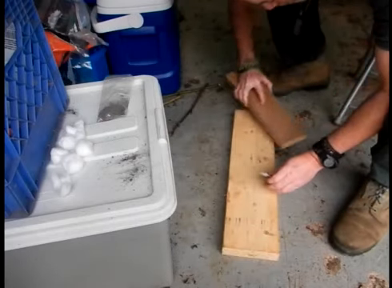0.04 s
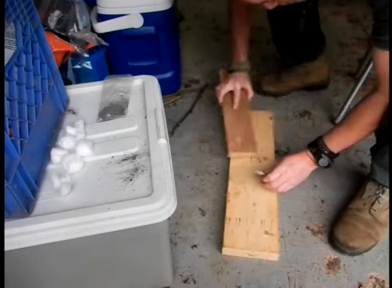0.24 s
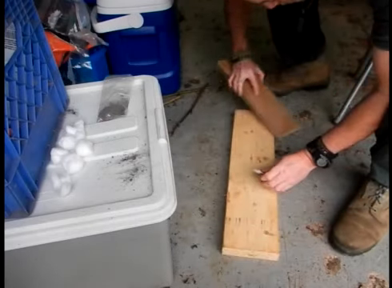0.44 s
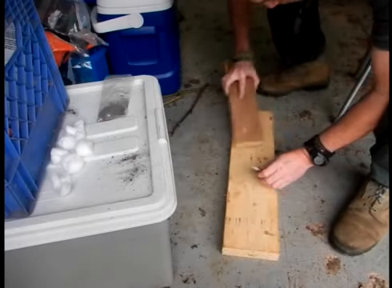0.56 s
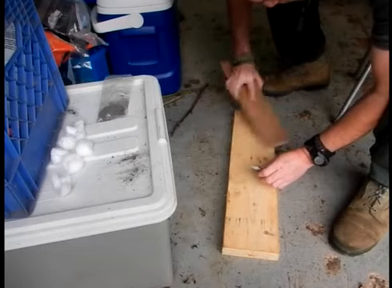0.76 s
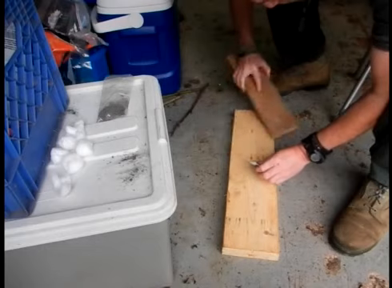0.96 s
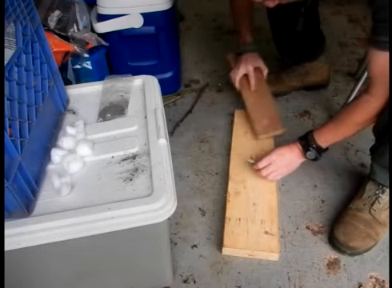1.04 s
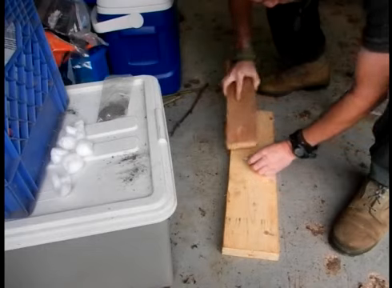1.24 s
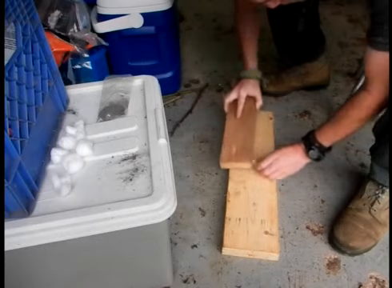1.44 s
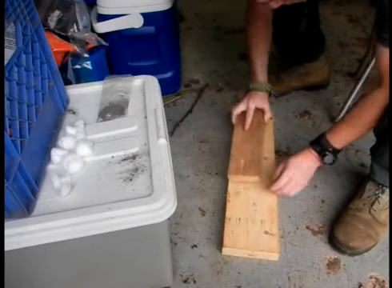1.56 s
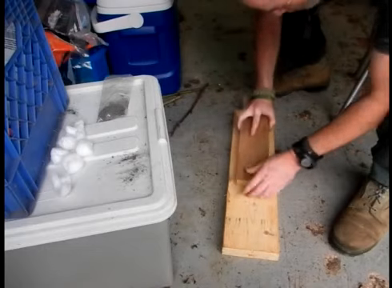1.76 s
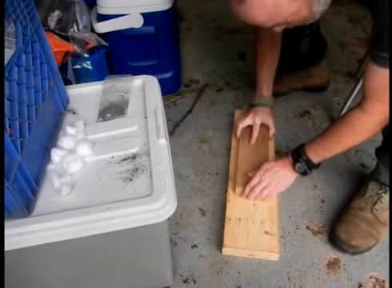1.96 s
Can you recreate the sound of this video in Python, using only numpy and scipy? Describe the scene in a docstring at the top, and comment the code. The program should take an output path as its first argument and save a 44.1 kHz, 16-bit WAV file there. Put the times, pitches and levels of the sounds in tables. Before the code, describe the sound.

A wooden board cracks down on a plank and scrapes forward with a gritty, squeaky rasp, twice within the first second; then faint sliding and two soft taps, close stereo pickup in a small garage with steady room noise.

```python
"""On a garage floor, a short wooden board is twice knocked down on a plank and pushed along it.
Each knock cracks, rings damped modes of the wood and thuds; each push is small slips shaking those modes
under a hiss of crushed grit, with stick-slip chirps. A corner scuffs once on the way back.
Then the board slides quietly into place, as shaped noise, with two soft taps.
Steady room noise and a faint high whine lie beneath."""
import sys
import numpy as np
from scipy import signal
from scipy.fft import rfft, irfft
from scipy.io import wavfile
from scipy.ndimage import uniform_filter1d

SR = 44100
rng = np.random.default_rng(int(sys.argv[2]) if len(sys.argv) > 2 else 0)


def int16_out(signal):
    """Quantize to a 16-bit WAV file."""
    q = np.round(np.clip(np.atleast_2d(signal).T, -1, 1) * 32767)
    wavfile.write(sys.argv[1], SR, q.astype(np.int16))


N = 88200
TIME = np.arange(N) / SR  # s
FREQS = np.arange(N // 2 + 1) * SR / N  # Hz

# Room noise: (frequency [Hz], density [dB per Hz])
AIR_SPECTRUM = [(25, -29), (85, -6), (150, -6.5), (250, -13), (320, -7), (410, 1), (600, -7), (1900, -10.5),
                (2600, -15.5), (5000, -17.5), (7000, -22.5), (13000, -24), (15500, -53)]
AIR_DB = -50.5
# Left-right likeness of sound from all around: (frequency [Hz], correlation [0-1])
LIKENESS = [(60, 0.42), (300, 0.06), (700, 0.2), (1500, 0.59), (3000, 0.47), (6000, 0.1), (15000, 0.27)]
# Electrical whine, rows left and right: (level [dB])
WHINE_LEVELS = [
    [-74],
    [-65],
]
WHINE_HZ, WHINE_WAVER_HZ = 14836, 8

# Quiet sliding and handling: (time [s], level [dB])
SLIDE_LEVEL = [(0, -63.5), (0.78, -58), (0.95, -66.5), (1.35, -58), (1.8, -54.5), (2.0, -50.5)]
# Its rustle: (frequency [Hz], density [dB per Hz])
SLIDE_SPECTRUM = [(200, -22), (450, 5.5), (900, -2.5), (1700, 0), (2500, -2), (5000, -2), (7500, -7),
                  (12500, -6.5), (15500, -26)]

# Modes of the wood, the two main bending modes first:
# (frequency [Hz], level when struck [dB], level when rubbed [dB], decay t60 [s])
WOOD_MODES = [(509, -18.5, -23, 0.13), (715.8, -44.5, -9.5, 0.14), (400.8, -30.5, -44, 0.17),
              (857, -37.5, -24, 0.15), (1111, -36.5, -10.5, 0.19), (1277, -33, -7.5, 0.1),
              (1558, -45, -6, 0.041), (1677, -21, -3, 0.043), (1812, -20, -8.5, 0.12),
              (1964, -19, -2.5, 0.045), (2570, -38, -16, 0.049), (2830, -28, -6, 0.038),
              (4030, -40.5, -16, 0.059), (4913, -40, -16.5, 0.049)]
RADIATION_HZ = 250  # narrow boards radiate little below this

# One list per push of the board: (time [s], level of the wood's rasp [dB], level of the gritty hiss [dB])
STROKES = [
    [(0.206, -33, -52), (0.240, -42, -50), (0.247, -34, -49), (0.259, -32.5, -45), (0.267, -37, -47),
     (0.277, -37, -45), (0.29, -34.5, -50), (0.297, -40, -52), (0.32, -31, -45), (0.333, -39.5, -54),
     (0.342, -39.5, -53), (0.37, -65, -60)],
    [(0.421, -46, -52), (0.427, -36.5, -40.5), (0.435, -41.5, -52), (0.455, -73, -58)],
    [(0.64, -52, -49.5), (0.68, -41, -56.5), (0.702, -40, -52), (0.712, -34, -46), (0.722, -33, -50),
     (0.732, -37.5, -59), (0.75, -67, -67)],
]
# Shaking of the second bending mode as the board passes along: (time [s], extra level [dB])
SECOND_MODE_LEVEL = [(0.24, -8), (0.31, 0.5), (0.42, -5), (0.70, 3), (0.718, 21), (0.75, 13)]
# Broad friction noise: (frequency [Hz], density [dB per Hz])
RUB_SPECTRUM = [(30, -7.5), (120, 1), (230, -8.5), (350, -16), (480, -3.5), (900, -10), (1700, 2.5),
                (2400, -10), (4500, -16.5), (8000, -25)]
# Dust crushed between the faces: (frequency [Hz], density [dB per Hz])
GRIT_SPECTRUM = [(1000, -34), (2400, 9), (3200, 7.5), (5000, 3.5), (7000, -3), (10000, 0), (13000, -6.5),
                 (15500, -14)]
SLIPS_PER_S, SLIP_SPREAD_DB = 650, 2  # small slips of the grain
GRIT_PER_S, GRIT_SPREAD_DB, GRIT_JUDDER_DB = 9000, 0.5, -1
RASP_DB, RUB_DB, GRIT_DB = -0.5, -3, 4.5
MODE_WANDER, MODE_SWELL_DB = .014, 3.5  # moving contact: detuning [share of pitch], uneven feeding

# The grain catches and chirps: (time [s], level [dB], pitch [Hz], build-up [s])
CATCHES = [(0.2415, -26.5, 1630, .0035), (0.255, -24, 1630, 0.0072), (0.2712, -20.5, 1640, 0.00096),
           (0.2771, -30, 1750, 0.0052), (0.2817, -25, 1867, 0.0063), (0.2837, -39.5, 4850, .003),
           (0.2998, -32, 2990, 0.0025), (0.303, -26, 1620, 0.0031), (0.3150, -19, 1596, .003),
           (0.322, -26, 1596, 0.0027), (0.323, -39.5, 4007, 0.0032), (0.4240, -27, 1810, 0.00189),
           (0.6835, -28.5, 1307, 0.0061), (0.6954, -25, 1626, 0.0028), (0.704, -21, 1750, 0.0037),
           (0.7109, -22, 1826, 0.0018), (0.7100, -38, 2720, 0.0032), (0.717, -23.5, 1666, 0.005)]
# Damped ring of a catch: (multiple of its pitch [ratio], level [dB], decay t60 [s])
CATCH_RING = [(1, 0, 0.014), (.72, -9.5, 0.014), (1.5, -30, 0.028), (2.8, -37, .006)]
CATCH_WAVER = 0.0083  # unsteadiness, as a share of the pitch

# Board meets plank: (time [s], level [dB], brightness of the contact [Hz], floor thud [dB], crack [dB],
# crack pitch [ratio], extra first mode [dB], extra second mode [dB], pitch of the first mode [Hz])
KNOCKS = [(0.2050, -2, 2460, 4.5, 4, 0.94, 1, 10.5, 506.5),
          (0.6380, -2.5, 6500, -9, 5.5, 0.95, -0.5, -17, 505.6),
          (0.664, -27.5, 500, 16.5, -8, 0.87, -8, 0, 500),
          (1.6560, -23, 1760, 3.5, 3, 0.97, 4.5, 26.5, 506),
          (1.8872, -21, 1330, 1, 13.5, 1.02, 1.5, 12.5, 517)]
# Heavily damped first crack of a knock: (frequency [Hz], level [dB], decay t60 [s])
CRACK_MODES = [(1190, -9, 0.0076), (1605, -2, 0.0036), (2524, -13.5, 0.0082), (3736, -20.5, 0.01),
               (5720, -16, 0.0047)]
# The plank against the floor: (frequency [Hz], level [dB], decay t60 [s])
THUD_MODES = [(135.4, -5, 0.098), (151, 0, 0.039), (51, 3, 0.031)]
# Dense short ring of both boards: (frequency [Hz], density [dB per Hz])
CLATTER_SPECTRUM = [(40, -11), (250, 4), (430, 17.5), (900, 8.5), (1900, -3), (3000, -0.5), (5500, -7.5),
                    (7000, -18), (15000, -10)]
THUD_DB, CLATTER_DB, CLATTER_T60_S = -32.5, -24.5, 0.12
SEATING_S = 0.0013  # time for the faces to meet

# Colour of the reverberation: (frequency [Hz], level [dB])
ROOM_COLOUR = [(60, -7), (300, -1.5), (500, -0.5), (2000, -5.5), (5000, 3), (15000, 2)]
ROOM_DB, ROOM_T60_S, ROOM_DELAY_S = -6, 0.24, .004
# Stereo balance: (frequency [Hz], left minus right [dB])
BALANCE = [(60, -1.5), (200, 2), (500, 2), (1150, 5.5), (1800, 1.5), (9000, 0), (15000, -2)]
LEFT_LAG_S, CUTOFF_HZ = .00003, 15200


def from_db(db):
    """Decibels to gain."""
    return 10 ** (np.asarray(db) / 20)


def rms_one(x):
    """Scale to rms 1."""
    return x / np.sqrt(np.mean(x ** 2) + 1e-20)


def at_hz(points):
    """Read a frequency table at every frequency, on a log scale."""
    hz, value = np.transpose(points)
    return np.interp(np.log(FREQS + 1), np.log(hz), value)


def over_time(points):
    """Read a (time, dB) table as a gain curve."""
    return from_db(np.interp(TIME, *np.transpose(points)))


def colour(x, spectrum):
    """Shape a sound with a spectrum; rms 1."""
    return rms_one(irfft(rfft(x) * from_db(at_hz(spectrum)), N))


def diffuse_noise(spectrum):
    """Stereo noise from all around, its left-right likeness varying with frequency."""
    alike = at_hz(LIKENESS)
    mid, side = rfft(rng.standard_normal((2, N)))
    stereo = np.sqrt(1 + alike) * mid + np.sqrt(1 - alike) * side * [[1], [-1]]
    return colour(irfft(stereo, N), spectrum)


def wobble(size):
    """Random wandering, smoothed twice over the given number of samples; rms 1."""
    smooth = uniform_filter1d(rng.standard_normal(N), size, mode="wrap")
    return rms_one(uniform_filter1d(smooth, size, mode="wrap"))


def grains(per_s, spread_db):
    """Random clicks of uneven size and either sign."""
    sizes_db = spread_db * np.minimum(rng.exponential(1, N), 4)
    sizes = from_db(sizes_db) * rng.choice([-1, 1], N)
    return sizes * (rng.random(N) < per_s / SR)


def evened(x):
    """Hold the level at 1 over about ten milliseconds, keeping the fine grain."""
    return x / np.sqrt(np.abs(uniform_filter1d(x ** 2, size=440)) + 1e-12)


def dying(seconds, t60):
    """Exponential decay from 1, falling 60 dB in t60."""
    return np.exp(-np.log(1000) * seconds / t60)


def rising(s):
    """Smooth rise from 0 to 1 in about s seconds."""
    return 1 - np.exp(-(TIME / s) ** 2)


def delay(x, s):
    """Start a sound s seconds later."""
    silence = np.zeros(x.shape[:-1] + (int(s * SR),))
    return np.concatenate([silence, x], axis=-1)[..., :N]


def ring(x, hz, t60):
    """Two-pole resonator: a unit click sets a sine of height 1 ringing."""
    r, w = from_db(-60 / (t60 * SR)), 2 * np.pi * hz / SR
    return signal.lfilter([0, np.sin(w)], [1, -2 * r * np.cos(w), r * r], x + 1e-18)


def modes(x, table):
    """Shake a set of (Hz, dB, t60) modes; neighbours swing in opposite directions."""
    return sum((-1) ** k * from_db(db) * ring(x, hz, t60) for k, (hz, db, t60) in enumerate(table))


def radiated(x):
    """Take away the bass that a narrow board cannot radiate."""
    highpass = signal.butter(2, RADIATION_HZ, "high", fs=SR, output="sos")
    return signal.sosfilt(highpass, x + 1e-18)


def shifting(x):
    """A mode under a moving contact: its pitch and strength wander."""
    warped = TIME + np.cumsum(MODE_WANDER * wobble(size=600)) / SR
    return np.interp(warped, TIME, x) * from_db(MODE_SWELL_DB * wobble(size=450))


def background():
    """Steady room noise: diffuse noise, strongest in the bass and lower middle."""
    return from_db(AIR_DB) * diffuse_noise(AIR_SPECTRUM)


def whine():
    """A thin, steady electrical whine, mostly on the right: one sine of slightly wavering pitch."""
    phase = 2 * np.pi * np.cumsum(WHINE_HZ + WHINE_WAVER_HZ * wobble(size=900)) / SR
    return from_db(WHINE_LEVELS) * np.sqrt(2) * np.sin(phase)


def garage(x):
    """Short diffuse reverberation: a decaying noise tail after a small gap."""
    tail = delay(diffuse_noise(ROOM_COLOUR) * dying(TIME, ROOM_T60_S), ROOM_DELAY_S)
    echo = rms_one(tail) / np.sqrt(N)  # unit energy
    return from_db(ROOM_DB) * signal.fftconvolve(x, echo, axes=-1)[:, :N]


def sliding():
    """Soft rustle of the board being eased into place: diffuse noise under a level curve."""
    return over_time(SLIDE_LEVEL) * diffuse_noise(SLIDE_SPECTRUM)


def scrapes():
    """Small slips shake the wood's modes, while fine grit hisses between the faces."""
    out = np.zeros((2, N))
    second_gain = over_time(SECOND_MODE_LEVEL)
    for stroke in STROKES:
        s, rasp_db, hiss_db = np.transpose(stroke)
        slips = grains(SLIPS_PER_S, SLIP_SPREAD_DB)
        wood = np.zeros(N)
        for k, (hz, _, rubbed_db, t60) in enumerate(WOOD_MODES):
            coupling = second_gain if k == 1 else 1
            wood += coupling * from_db(rubbed_db) * shifting(ring(slips, hz, t60))
        rub = evened(colour(slips, RUB_SPECTRUM))
        rasp = from_db(RASP_DB) * evened(radiated(wood)) + from_db(RUB_DB) * rub
        # separate grit for left and right, juddering together
        grit = np.array([colour(grains(GRIT_PER_S, GRIT_SPREAD_DB), GRIT_SPECTRUM) for _ in range(2)])
        hiss = grit * from_db(GRIT_DB + GRIT_JUDDER_DB * wobble(size=110))
        rasp_gain = from_db(np.interp(TIME, s, rasp_db))
        hiss_gain = from_db(np.interp(TIME, s, hiss_db))
        moving = (TIME >= s[0]) & (TIME <= s[-1])
        out += moving * (rasp_gain * rasp + hiss_gain * hiss)
    return out


def catches():
    """Stick-slip chirps within the pushes: each builds up at its own unsteady pitch, lets go and dies."""
    out = np.zeros(N)
    t = TIME[:N // 20]
    for s, db, hz, build_s in CATCHES:
        waver = CATCH_WAVER * wobble(size=60)[:len(t)]
        phase = 2 * np.pi * np.cumsum(hz * (1 + waver)) / SR
        swell = np.minimum(t / build_s, 1)
        after = np.maximum(t - build_s, 0)  # time since letting go
        chirp = np.zeros(len(t))
        for multiple, level_db, t60 in CATCH_RING:
            chirp += swell * from_db(level_db) * dying(after, t60) * np.sin(multiple * phase)
        out += from_db(db) * np.interp(TIME - s, t, chirp, left=0, right=0)
    return radiated(out)


def knocks():
    """Each contact gives a crack, the ring of the wood and a thud; softer contacts are mostly duller."""
    out, click = np.zeros(N), signal.unit_impulse(N)
    for s, db, bright_hz, thud_db, crack_db, crack_pitch, first_db, second_db, first_hz in KNOCKS:
        struck = [(hz, level_db, t60) for hz, level_db, _, t60 in WOOD_MODES]
        struck[0] = (first_hz, struck[0][1] + first_db, struck[0][2])
        struck[1] = (struck[1][0], struck[1][1] + second_db, struck[1][2])
        wood = modes(click, struck)
        crack_modes = [(hz * crack_pitch, level_db, t60) for hz, level_db, t60 in CRACK_MODES]
        crack = from_db(crack_db) * modes(click, crack_modes)
        dense = evened(colour(rng.standard_normal(N), CLATTER_SPECTRUM))
        clatter = from_db(CLATTER_DB) * dense * dying(TIME, CLATTER_T60_S)
        floor = sum(from_db(level_db) * ring(click, hz, t60) for hz, level_db, t60 in THUD_MODES)
        thud = from_db(THUD_DB + thud_db) * floor
        # the boards swell as the faces meet; the contact's low-pass dulls everything
        boards = radiated(rising(SEATING_S) * (wood + crack + clatter))
        contact = signal.butter(2, bright_hz, fs=SR)
        out += from_db(db) * delay(signal.lfilter(*contact, boards + thud), s)
    return out


def scene():
    """The boards in the garage; only knocks, scrapes and catches feed the reverberation."""
    boards = knocks() + scrapes() + catches()
    return boards + garage(boards) + sliding() + background()


def record(dry):
    """The left microphone hears the middle range louder and slightly later; whine is added, the top cut."""
    gains = from_db(at_hz(BALANCE) * [[.5], [-.5]])
    lag = np.exp(-2j * np.pi * FREQS * LEFT_LAG_S * [[1], [0]])
    heard = irfft(rfft(dry) * gains * lag, N) + whine()
    top_cut = signal.ellip(10, .2, 80, CUTOFF_HZ, fs=SR, output="sos")
    return signal.sosfilt(top_cut, heard)


dry = scene()
out = record(dry)
int16_out(out)
```